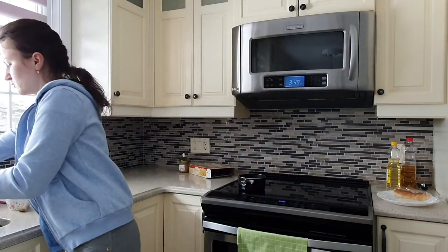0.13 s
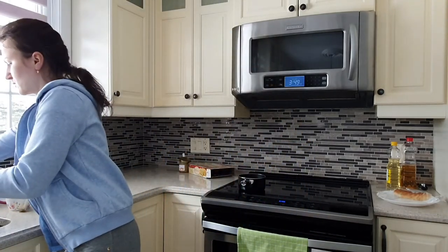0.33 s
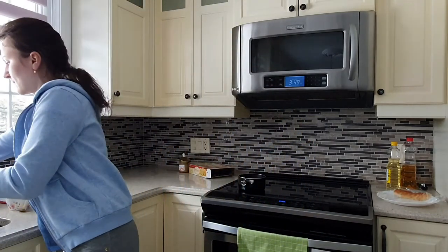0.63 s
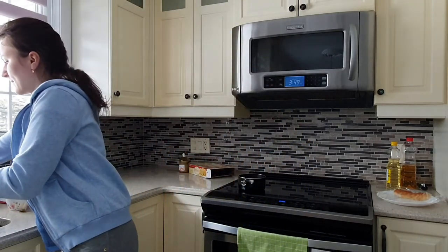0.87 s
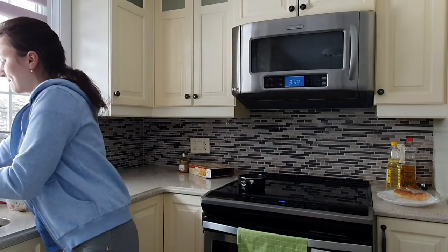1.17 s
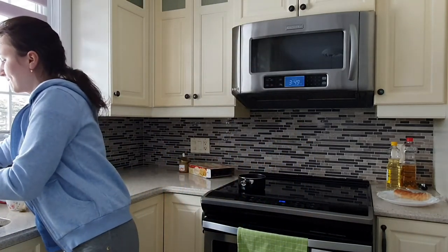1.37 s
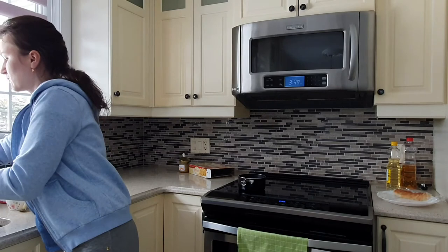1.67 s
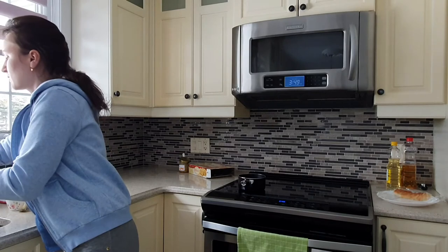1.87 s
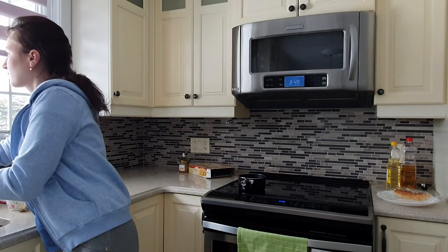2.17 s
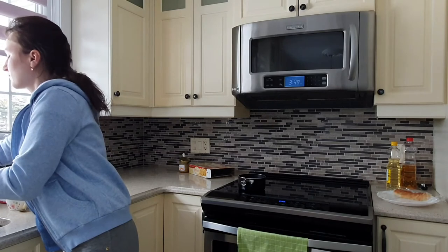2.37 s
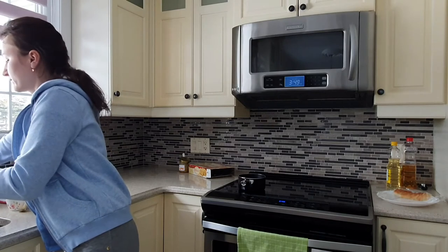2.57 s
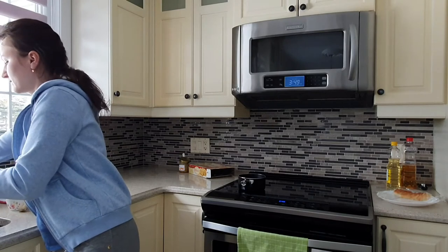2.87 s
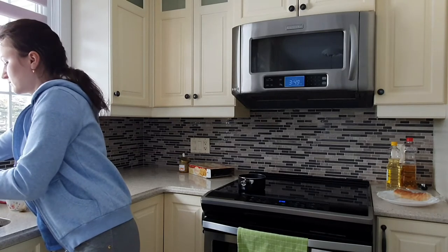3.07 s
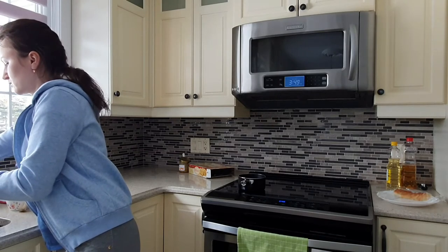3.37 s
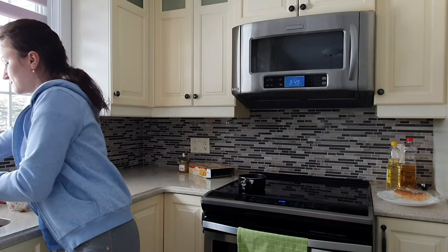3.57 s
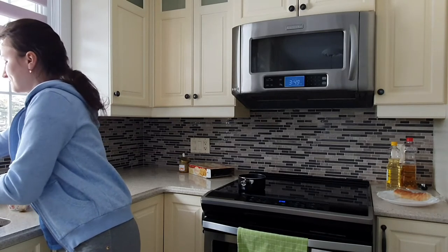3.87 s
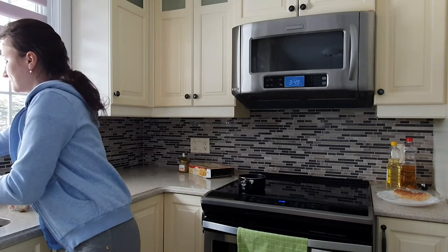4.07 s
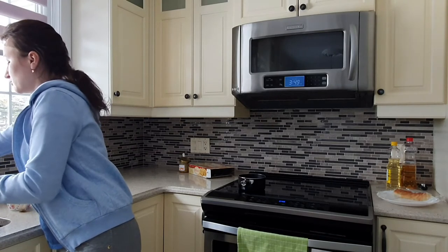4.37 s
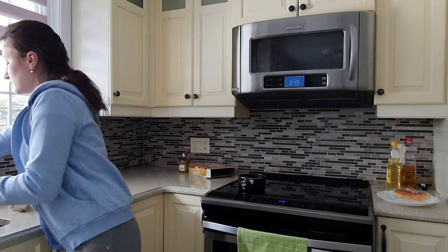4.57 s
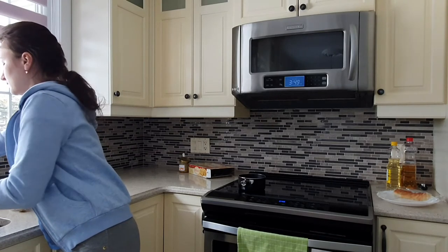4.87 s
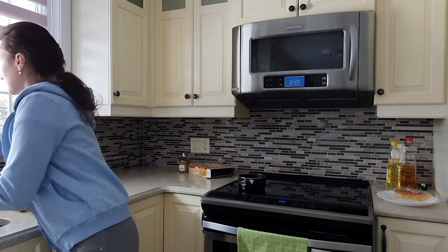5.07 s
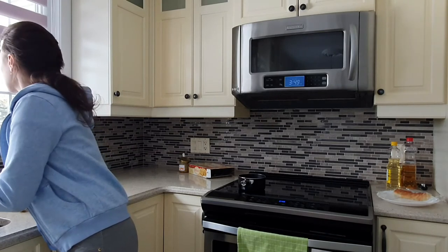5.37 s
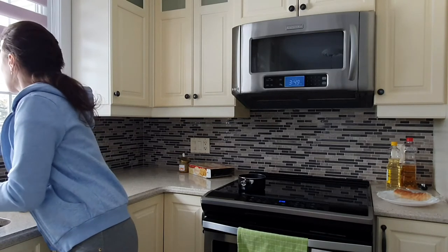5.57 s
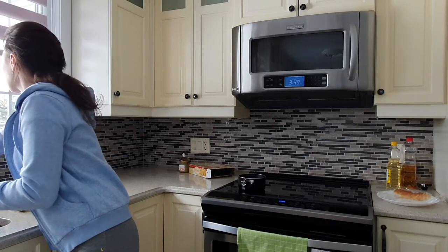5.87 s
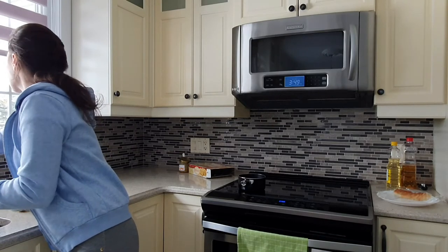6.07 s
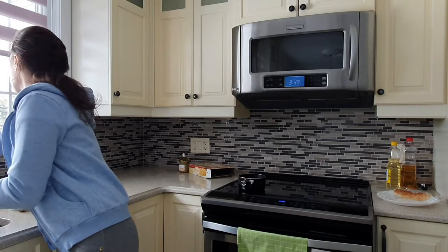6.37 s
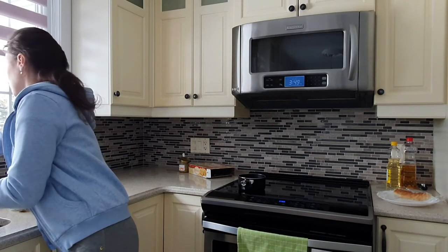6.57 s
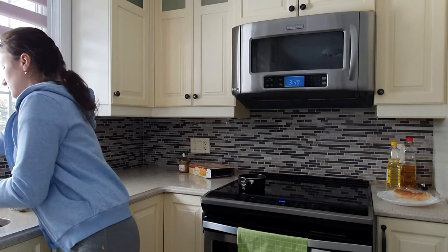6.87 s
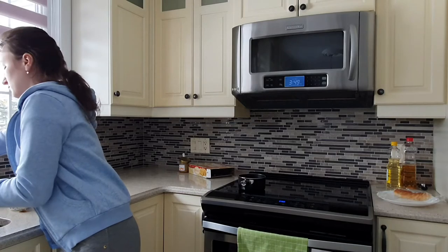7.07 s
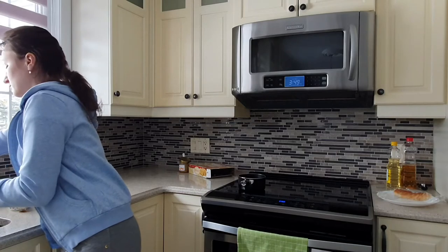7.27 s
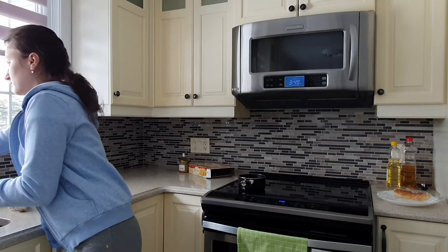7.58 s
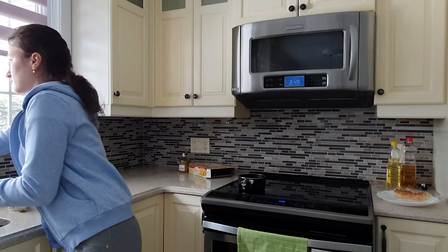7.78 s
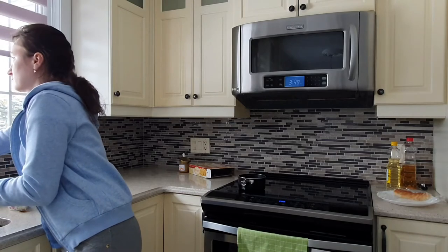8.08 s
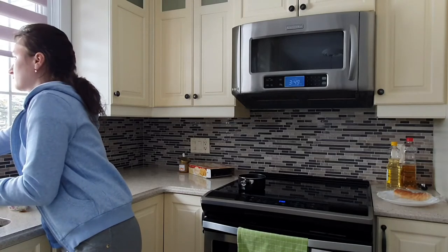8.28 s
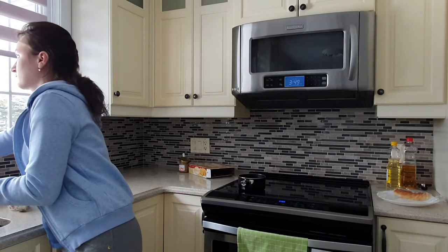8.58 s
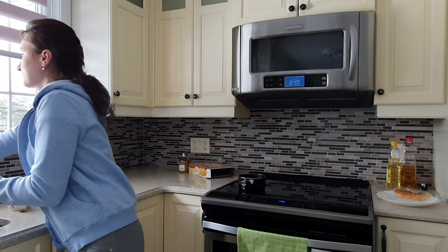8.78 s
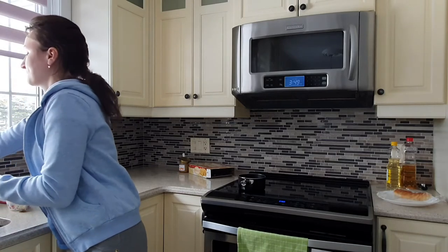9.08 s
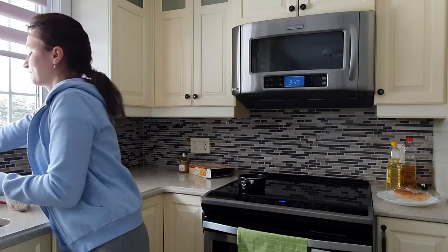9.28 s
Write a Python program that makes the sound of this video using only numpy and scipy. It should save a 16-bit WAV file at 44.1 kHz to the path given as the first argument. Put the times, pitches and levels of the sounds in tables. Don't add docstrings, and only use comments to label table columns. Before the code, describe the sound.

Close stereo pickup of a kitchen sink, the water slightly to the left. A hard stream hisses and drums on a steel pan for two seconds, then plunges into collected water with fizzing foam and bubbles, splashing more roughly in the middle and smoother later. The tap closes abruptly with a gulp and low thud. Near silence follows, with one drop and a small hollow trickle in the sink bowl.

```python
import sys
import numpy as np
from scipy import signal
from scipy.fft import rfft, irfft, next_fast_len
from scipy.io import wavfile
from scipy.ndimage import uniform_filter1d

SR = 44100
rng = np.random.default_rng(int(sys.argv[2]) if len(sys.argv) > 2 else 0)


def waveform_to_disk(signal):
    frames = np.transpose(np.atleast_2d(signal))
    scaled = np.clip(frames, -1, 1) * 32767
    samples = np.round(scaled).astype(np.int16)
    wavfile.write(sys.argv[1], SR, samples)


def nominal_scale(level):
    x = np.asarray(level, float) / 20
    return 10 ** x


N = 415422

# f/Hz, density/dB per Hz
SPRAY_SPECTRUM = [(1100, -24.5), (1800, -5.5), (2500, -14.5), (3200, -4.5), (4800, -5.5), (6900, 1),
                  (7800, -6.5), (8800, 3.5), (10300, 1.5), (11100, 0), (12500, 2.5), (13800, -3.5),
                  (15100, 1.5), (16500, 0.5)]
# f/Hz, density/dB per Hz
FOAM_SPECTRUM = [(880, -41), (1500, -14), (2150, -5), (2330, -3.5), (3040, -0.5), (4180, -1), (4630, -2),
                 (5450, -2), (5910, -2), (7600, -7), (9880, -31), (16700, -120)]
# f/Hz, density/dB per Hz
FROTH_SPECTRUM = [(300, -7.5), (450, -2), (620, -5), (800, 0), (950, -2), (1400, -2), (1800, -7),
                  (2600, -8.5)]
# f/Hz, density/dB per Hz
PIPE_SPECTRUM = [(30, -30), (70, 4), (180, -1.5), (400, -12), (900, -3), (2000, -38)]
# f/Hz, density/dB per Hz
HUSH_SPECTRUM = [(18, -44), (30, -20), (203, -6.5), (413, -18), (645, -19), (830, -15), (1100, -23.5),
                 (1380, -21), (1750, -24.5), (3940, -27.5), (15800, -38)]
# f/Hz, width/Hz, level/dB
PAN_MODES = [(355, 60, -17), (500, 50, -10), (580, 50, -4), (650, 40, -1), (725, 60, -2), (800, 60, -4.5),
             (890, 90, -10), (985, 45, -4), (1130, 120, -8), (1230, 60, -7), (1320, 80, -4), (1420, 80, -3),
             (1550, 90, -9), (1730, 200, -15), (1950, 100, -11), (2490, 110, -7.5)]
# f/Hz, width/Hz, level/dB
WALL_MODES = [(2720, 58, -3), (3200, 18, 1), (3527, 16, 3), (3534, 41, 5), (4553, 36, 4), (4780, 50, -2.5),
              (5190, 20.5, 3), (5750, 66, -19)]
# f/Hz, width/Hz, level/dB
SINK_MODES = [(55, 40, -33), (112, 22, -9), (140, 22, -10), (177, 9, 1.5), (217, 11, 1), (240, 18, -7),
              (300, 70, -14), (362, 30, -7), (490, 40, -5), (557, 9, 5.5), (586, 30, -5), (612, 10, 3),
              (660, 45, -2)]
# f/Hz, width/Hz, level/dB
SLOP_MODES = [(115, 25, -15), (141, 16, -11), (175, 30, -13), (206, 16, -10), (239, 14, -8), (265, 25, -14),
              (310, 40, -17), (380, 60, -16), (440, 40, -17), (491, 16, -6), (557, 11, -5), (618, 18, -4),
              (650, 25, -11), (710, 30, -13), (810, 50, -14), (950, 150, -21), (1300, 250, -25),
              (2030, 380, -30)]
# f/Hz, width/Hz, level/dB
DRIP_MODES = [(618, 57, -5), (790, 120, 9), (3200, 1000, -15.5)]
# f/Hz, t60/s
KITCHEN_T60 = [(200, .42), (600, .62), (1500, .6), (4000, .62), (8000, .48), (14000, .32)]
# f/Hz, likeness [-1 to 1]
PORT_LIKENESS = [(60, 0.287), (120, 0.95), (240, 1), (480, 0.42), (950, 0.15), (1890, 0.01), (3770, 0.01),
                 (7520, 0.042), (15000, 0.03)]
# f/Hz, left minus right/dB
PORT_LEAN = [(60, -1.5), (120, 0), (240, -0.5), (480, 1), (950, 1.5), (1890, -0.5), (5500, 3.5),
             (9500, -2.5), (14000, 1)]
# f/Hz, spread/dB
PATCHY_COVERED = [(500, .5), (1200, 1.6), (3500, .8), (7000, 1), (12000, 1.3)]
# f/Hz, spread/dB
PATCHY_STEEL = [(500, 1), (1200, 1), (3500, 2.5), (7000, 2), (12000, 2)]
# t/s, length/s, extra spray/dB, extra gurgle/dB
SPLASHES = [(-0.05, 0.12, 4.5, 6), (0.17, 0.089, 3, 8), (0.316, 0.023, 6, -14), (0.46, 0.025, 2.5, -4),
            (0.61, 0.025, 2, 6.5), (0.658, 0.043, 2, -1), (0.795, 0.044, 3, 0.7), (0.94, 0.03, 3.5, 4.5),
            (1.02, 0.024, 4.5, -2), (1.307, 0.023, 5.5, 6.5), (1.473, 0.036, 3, 5.5),
            (1.582, 0.049, 3, -2.5), (1.808, 0.03, 3, 8), (1.914, 0.04, 1.5, 0), (2.026, 0.061, 4, 5),
            (2.118, 0.025, 0, 2.5), (2.214, 0.047, 3.5, -4), (2.323, 0.065, 2, 2.5),
            (2.479, 0.03, 1.5, 1.5), (3.075, 0.063, 1, 1.8), (3.474, 0.032, 1.5, 1), (3.582, 0.075, 1, 2),
            (3.692, 0.03, 1.5, 2), (3.864, 0.13, 4.5, 3), (4.207, 0.043, 3.5, 4.5),
            (4.483, 0.039, 5.5, 6.5), (4.574, 0.027, 6, 2.5), (4.65, 0.095, 5.5, 4.5),
            (4.787, 0.035, 5, 7.5), (4.845, 0.034, 4, 6.5), (4.93, 0.03, 3.5, 2), (5.008, 0.036, 4.5, 5.5),
            (5.093, 0.04, 4.5, 6.5), (5.155, 0.048, 7, 2), (5.568, 0.12, 3.5, 5.5), (5.79, 0.049, 6, 4.5),
            (5.882, 0.03, 5.5, 6.5), (5.964, 0.071, 5.5, 1), (6.144, 0.03, 7, 4.5), (6.225, 0.04, 6.5, 3.6),
            (6.41, 0.03, 4.5, -0.5), (6.75, 0.03, 0.5, 0.5), (7.024, 0.064, 3, 1), (7.268, 0.025, 3, 2.5),
            (7.346, 0.11, 0.5, 1), (7.75, 0.057, -3, 2.5), (7.917, 0.04, 0.5, -0.5),
            (8.098, 0.035, 1.2, -2.5)]
# t/s, length/s, extra spray/dB, extra gurgle/dB
ROUGH_FLOW = [
    (-.05, 0.41, 2.5, -3),
    (.55, 0.31, 1, 2),
    (1.21, 0.042, 3.5, 0.5),
    (1.75, 0.36, 2, 4.5),
    (3.8, 0.39, 1.5, 1.5),
    (4.2, 0.34, 2, 3.5),
    (4.48, 0.82, 2.5, 3.5),
    (5.28, .3, 1, 3.5),
    (5.56, 0.78, 3.5, 2.5),
    (6.36, 0.16, 1, 1.5),
]
# t/s, f/Hz, level/dB, length/s
GLUGS = [(1.099, 2454, -28, .07), (1.25, 2540, -27, 0.062), (1.963, 1765, -33, 0.068),
         (2.048, 954, -37, .06), (2.055, 691, -28, 0.073), (2.57, 1464, -36, 0.057), (3.15, 1214, -44, .06),
         (4.25, 1593, -46, .06), (4.273, 1050, -43, 0.09), (4.54, 1808, -35, .07), (4.671, 1765, -34, .06),
         (4.74, 3180, -39, .07), (4.78, 1937, -33, .06), (5.17, 777, -34, 0.096), (5.21, 4263, -42, .06),
         (6.034, 1421, -35, 0.13), (6.258, 2270, -34, .08), (6.46, 2411, -37, .06),
         (7.327, 955, -42, 0.071), (7.717, 640, -36, 0.065), (7.73, 1205, -43, 0.057),
         (7.77, 3057, -36, .06), (7.83, 1593, -49, 0.053), (8.498, 840, -41, .07), (8.52, 3460, -42, .06),
         (8.695, 1300, -35, 0.063), (8.69, 900, -40, 0.052), (8.771, 607, -38, 0.062),
         (0.248, 720, -29, .12)]
# t/s, f/Hz, level/dB, length/s
BOWL_HUMS = [
    (9.215, 560, -47, .09),
    (9.265, 237, -44, .12),
    (9.325, 556, -41, .2),
    (9.36, 610, -49, .12),
]

LAG = 16
COVER_S, COVER_TAKES_S = 2.07, 0.029
SHUT_S = 8.56
GULP_S, GULP_RISE_S = 8.69, 0.11
SLOP_S = 9.167


def clock():
    return np.arange(N) / SR


def ramp(start, takes):
    return np.clip((clock() - start) / takes, 0, 1)


def evened(x):
    return x / np.sqrt(np.mean(x ** 2) + 1e-20)


def read(points, hz):
    f, value = np.transpose(points)
    return np.interp(np.log(hz + 1), np.log(f + 1), value)


def colour(x, points):
    size = next_fast_len(N)
    gain = nominal_scale(read(points, np.fft.rfftfreq(size, 1 / SR)))
    return evened(irfft(rfft(x, size) * gain, size)[..., :N])


def wobble(ms):
    span = int(ms * SR / 1000)
    once = uniform_filter1d(rng.standard_normal(N), span)
    return evened(uniform_filter1d(once, span))


def ring(x, modes):
    out = np.zeros(N)
    for k, (hz, width, db) in enumerate(modes):
        r = np.exp(-np.pi * width / SR)
        turn = 2 * np.pi * hz / SR
        mode = signal.lfilter([(1 - r) * np.sin(turn)], [1, -2 * r * np.cos(turn), r ** 2], x)
        out += (-1) ** k * nominal_scale(db) * mode
    return evened(out)


def droplets(burst_db):
    return evened(rng.standard_normal(N) * nominal_scale(burst_db * wobble(3.03)))


def bubbles(low_hz, high_hz, per_s, cycles, spread_db):
    out = np.zeros(N)
    sizes = np.geomspace(low_hz, high_hz, num=16)
    for hz in sizes:
        u = np.arange(int(3 * cycles * SR / hz)) * hz / SR / cycles
        envelope = np.exp(-1.5 * u) * (1 - np.exp(-8 * u))
        grain = envelope * np.sin(2 * np.pi * cycles * u * (1 + 0.0643 * u))
        place, keep, luck = rng.random((5000, 3)).T
        strength = nominal_scale(-spread_db * np.log(luck + 1e-3))
        kept = keep * len(keep) < per_s * N / SR / len(sizes)
        pops = np.zeros(N)
        pops[(place * N).astype(int)] = strength * kept
        out += signal.oaconvolve(pops, grain * np.sqrt(hz) / np.linalg.norm(grain))[:N]
    return evened(out)


def kitchen(direct_db):
    hz = np.fft.rfftfreq(1024, 1 / SR)[:, None]
    t = np.arange(130) * 256 / SR
    a, b = rng.standard_normal((2, 513, 130)) + 1j * rng.standard_normal((2, 513, 130))
    same = np.clip(read(PORT_LIKENESS, hz), -1, 1)
    t60 = read(KITCHEN_T60, hz)
    decay = nominal_scale(-60 * t / t60) / np.sqrt(t60)
    ports = np.array([a, same * a + np.sqrt(1 - same ** 2) * b])
    tail = signal.istft(ports * decay, nperseg=1024, noverlap=768)[1]
    tail = np.pad(tail / np.linalg.norm(tail[0]), ((0, 0), (150, 0)))
    tail[[0, 1], [0, LAG]] = nominal_scale(direct_db)
    return tail / np.linalg.norm(tail[0])


def spread(drive, gain, surge_db, direct_db, count=4):
    lead = SR
    size = next_fast_len(N + lead, real=True)
    surge = nominal_scale(surge_db * wobble(11.0))
    gain = np.r_[gain[0] * surge[lead:0:-1], gain * surge]
    heard = 0
    for k in range(count):
        spot = np.resize(np.roll(drive, k * N // count), N + lead)
        heard = heard + rfft(gain * spot, size) * rfft(kitchen(direct_db), size)
    return irfft(heard, size)[:, lead:lead + N] / np.sqrt(count)


def filling(bare_db, bare_sag, covered_db, sag):
    t, cover = clock(), ramp(COVER_S, COVER_TAKES_S)
    return (1 - cover) * (bare_db - bare_sag * t) + cover * (covered_db - sag * (t - COVER_S))


def closing(start, db_per_s, gulp_db=0):
    fall = db_per_s * np.maximum(clock() - start, 0)
    return gulp_db * ramp(start - GULP_RISE_S, GULP_RISE_S) - fall


def splashing(column, rise, fall, share):
    rows, t = np.array(SPLASHES + ROUGH_FLOW), clock()[::64]
    since, length = t - rows[:, :1], rows[:, 1:2]
    held = np.clip(since / rise + 0.5, 0, 1) - np.clip((since - length) / fall, 0, 1)
    return share * np.interp(clock(), t, (rows[:, [column]] * held).max(axis=0))


def crests():
    return splashing(column=2, rise=0.025, fall=0.045, share=1.25)


def surges():
    return splashing(column=3, rise=0.056, fall=0.2, share=1.08)


def patchy(x):
    hz, t, z = signal.stft(x, SR, nperseg=1024, noverlap=768)
    patches = rng.standard_normal(z.shape[:0:-1]).T
    patches = uniform_filter1d(uniform_filter1d(patches, size=4, axis=0), size=12, axis=1)
    cover = np.clip((t - COVER_S) / COVER_TAKES_S, 0, 1)
    bare_db, covered_db = read(PATCHY_STEEL, hz)[:, None], read(PATCHY_COVERED, hz)[:, None]
    spread_db = bare_db * (1 - cover) + covered_db * cover
    return signal.istft(z * nominal_scale(spread_db * evened(patches)), nperseg=1024, noverlap=768)[1][:, :N]


def spray():
    db = filling(bare_db=-20, bare_sag=4.1, covered_db=-32.5, sag=0.28)
    db += crests() + closing(SHUT_S, db_per_s=130)
    drops = colour(droplets(burst_db=5.0), SPRAY_SPECTRUM)
    return spread(drops, nominal_scale(4.5 + db), surge_db=0.0, direct_db=-4.0)


def wavering(x):
    moments = np.arange(N) + np.cumsum(0.012 * wobble(120.8))
    return np.interp(moments, np.arange(N), x, period=N)


def pan():
    db = filling(bare_db=-28, bare_sag=0.78, covered_db=-60, sag=20) + 0.32 * surges()
    drum = wavering(ring(droplets(burst_db=2.0), PAN_MODES))
    return spread(drum, nominal_scale(3.0 + db), surge_db=1.5, direct_db=-8.5)


def sink():
    fall = 420
    db = filling(bare_db=-46, bare_sag=-1.1, covered_db=-43.5, sag=0)
    db += 5.5 * ramp(8.56, 0.1)
    db += closing(8.73, fall)
    heave = -1.5 - ramp(SHUT_S - GULP_RISE_S, GULP_RISE_S)
    flow = nominal_scale(db + 0.63 * wobble(120) * heave)
    bowl = spread(ring(droplets(burst_db=3.5), SINK_MODES), nominal_scale(5.0) * flow, surge_db=3.0, direct_db=-4.0)
    low_modes = [(35, 30, -15.5), (70, 40, 0.5)]  # f/Hz, width/Hz, level/dB
    buffet = [ring(rng.standard_normal(N) * nominal_scale(4.05 * wobble(60)), low_modes) for port in range(2)]
    buffet_db = -65 - 0.93 * clock() + closing(GULP_S, fall, gulp_db=7.4)
    return bowl + nominal_scale(buffet_db) * np.array(buffet)


def hush():
    return nominal_scale(-60.5) * colour(rng.standard_normal((2, N)), HUSH_SPECTRUM)


def glugs():
    out, tremble = np.zeros((2, N)), wobble(2.8)
    for s, hz, db, length in GLUGS + BOWL_HUMS:
        at = np.arange(int((s - length / 2) * SR), min(int((s + length / 2) * SR), N - LAG))
        u = (at / SR - s) / length
        bend = 0.038 * u + 0.021 * tremble[at]
        phase = 2 * np.pi * np.cumsum(hz * (1 + bend)) / SR
        tone = nominal_scale(db) * np.cos(np.pi * u) * np.sin(phase)
        out[0, at] += tone
        out[1, at + LAG // 4] += tone
    return out


def plunge():
    foam = bubbles(1374, 7990, per_s=6000, cycles=5.86, spread_db=4.5) + 0.81 * droplets(burst_db=6.0)
    walls = nominal_scale(-8) * ring(foam[::-1], WALL_MODES)
    db = filling(bare_db=-27, bare_sag=2.13, covered_db=-30, sag=0.018)
    db += closing(SHUT_S, db_per_s=102) + 0.41 * crests()
    return spread(colour(foam, FOAM_SPECTRUM) + walls, nominal_scale(0.5 + db), surge_db=1.0, direct_db=-9.5)


def gurgle():
    froth = bubbles(400, 2200, per_s=1500, cycles=9, spread_db=3) + 0.7 * droplets(burst_db=2)
    db = filling(bare_db=-54.0, bare_sag=0, covered_db=-41, sag=0.39)
    db += surges() + closing(GULP_S, db_per_s=220, gulp_db=8)
    return spread(colour(froth, FROTH_SPECTRUM), nominal_scale(5.5 + db), surge_db=1.2, direct_db=-3.0)


def knock():
    knock_s, t60 = 8.685, 0.06
    since = np.maximum(clock() - knock_s, 0)
    gain = nominal_scale(-33 - 60 * since / t60) * ramp(knock_s - 0.06, 0.073)
    thump = colour(rng.standard_normal(N), PIPE_SPECTRUM)
    return spread(thump, gain, surge_db=0, direct_db=8.0, count=3)


def drip():
    impact = 1.0 * (np.arange(N) == int(SLOP_S * SR) + 150)
    tap = ring(impact, DRIP_MODES)
    return nominal_scale(-41) * np.array([tap, np.roll(tap, LAG)]) / abs(tap).max()


def slop():
    swell_s = 0.125
    drops = droplets(burst_db=2.5)
    fizz = nominal_scale(-21.5) * colour(drops, FOAM_SPECTRUM) + nominal_scale(-29) * colour(drops, SPRAY_SPECTRUM)
    db = -55 + 4.5 * ramp(SLOP_S, swell_s) + closing(SLOP_S + swell_s, db_per_s=35)
    gain = nominal_scale(3.5 + db) * ramp(SLOP_S, 0.004)
    return spread(ring(drops, SLOP_MODES) + fizz, gain, surge_db=1.0, direct_db=4.0)


def scene():
    rush = spray() + pan() + plunge() + gurgle()
    rest = sink() + hush() + knock() + drip() + slop()
    return patchy(rush) + rest + glugs()


def starved(x):
    z = signal.stft(np.array([x[0] + x[1], x[0] - x[1]]) / 2, nperseg=1024, noverlap=768)[2]
    band = uniform_filter1d(uniform_filter1d(abs(z) ** 2, size=3, axis=1), size=9, axis=2)
    band_db = 10 * np.log10(abs(band) + 1e-20)
    busy_db = -35
    busy = np.log10(band.sum(axis=1, keepdims=True) + 1e-20) - busy_db / 10
    neighbours_db = uniform_filter1d(band_db, size=25, axis=1)
    weak = band_db < -5.5 + 1.1 * busy + neighbours_db
    weak &= busy > 0
    weak[:, :26] = weak[:, 300:] = False
    keep = uniform_filter1d(np.where(weak, nominal_scale(-20), 1), size=3, axis=2)
    mid, side = signal.istft(z * keep, nperseg=1024, noverlap=768)[1][:, :N]
    return np.array([mid + side, mid - side])


def roll_off(x):
    return signal.sosfilt(signal.butter(12, 15975, fs=SR, output="sos"), x)


def record(dry):
    hz = np.r_[0, np.geomspace(30, SR / 2, num=60)]
    lean_db = read(PORT_LEAN, hz) / 2
    ports = [signal.firwin2(1023, hz, nominal_scale(side * lean_db), fs=SR) for side in (1, -1)]
    heard = signal.oaconvolve(np.clip(dry, -1, 1), np.array(ports), "same", axes=1)
    edge = signal.firwin(1001, 15760, window=("kaiser", 9), fs=SR)
    mix = signal.oaconvolve(starved(heard), edge[None], "same", axes=1)
    return roll_off(mix)


dry = scene()
out = record(dry)
waveform_to_disk(out)
```